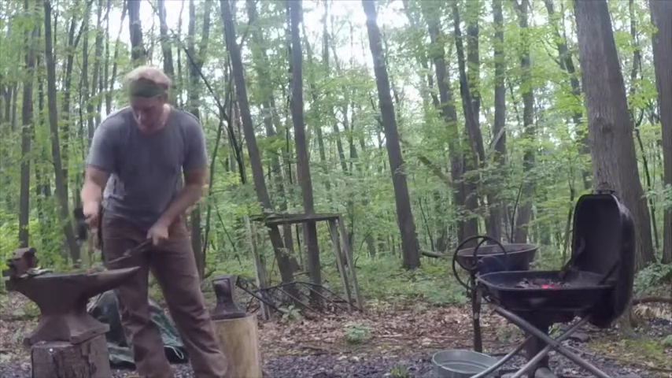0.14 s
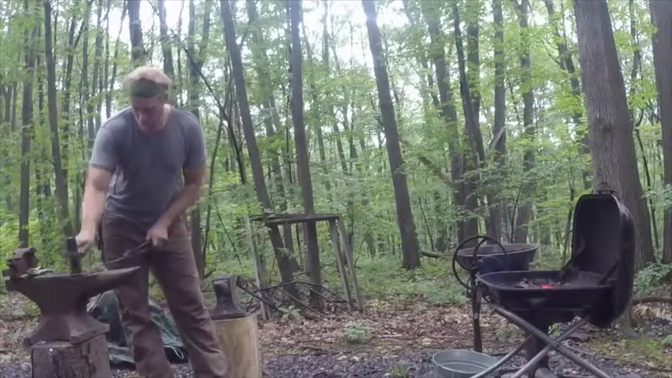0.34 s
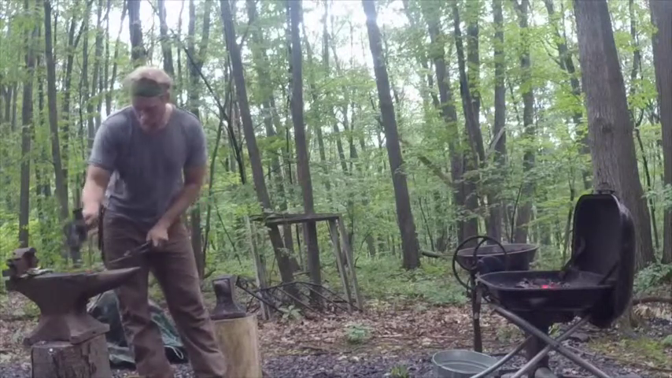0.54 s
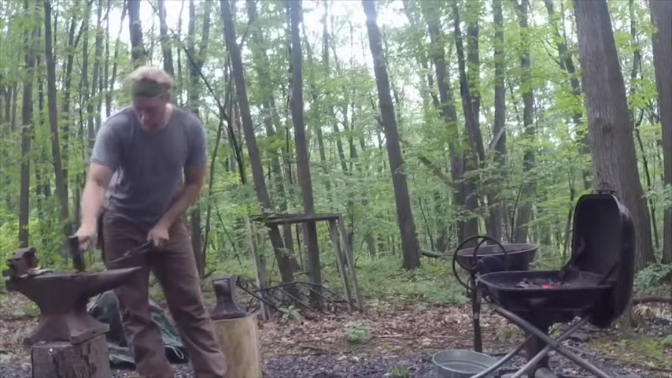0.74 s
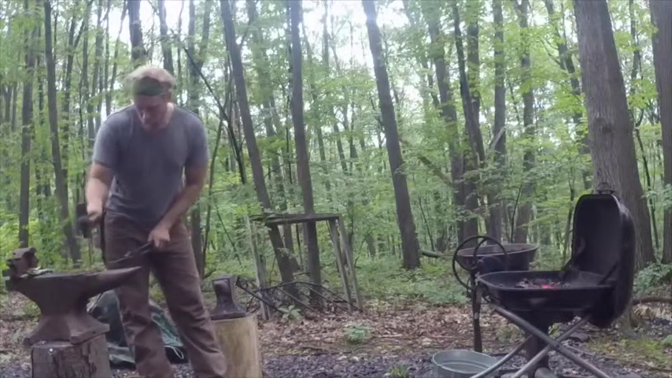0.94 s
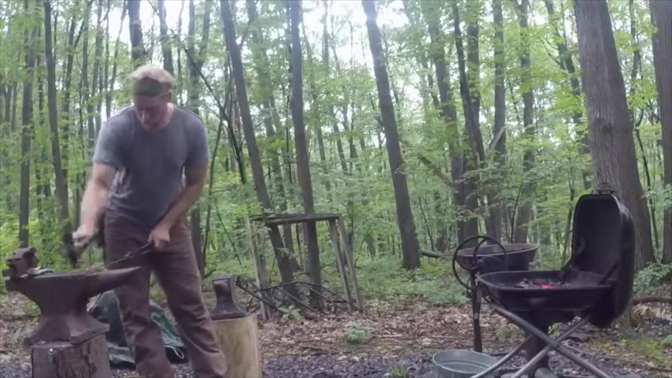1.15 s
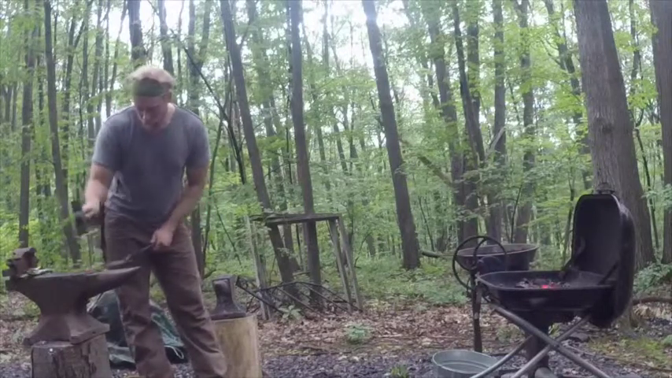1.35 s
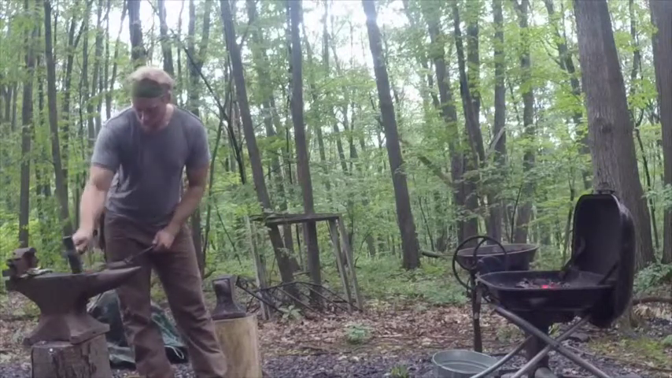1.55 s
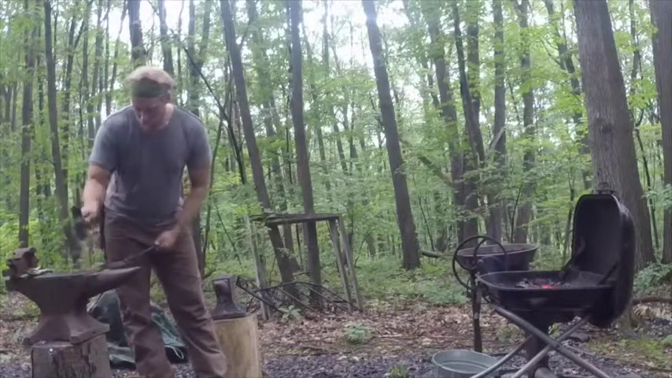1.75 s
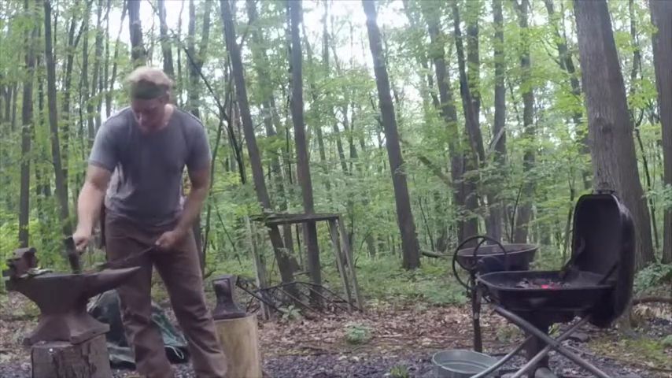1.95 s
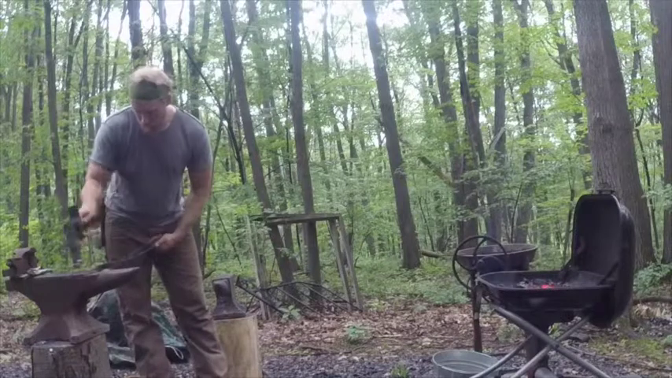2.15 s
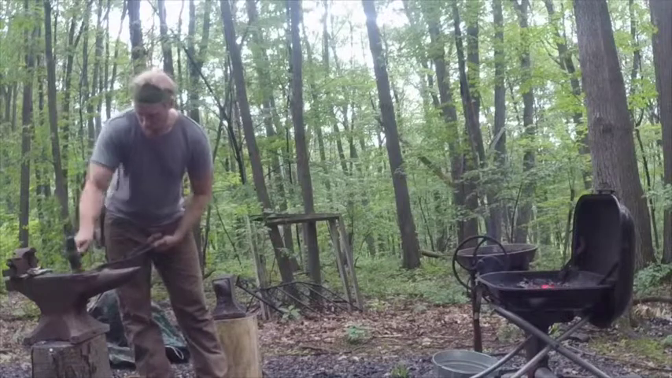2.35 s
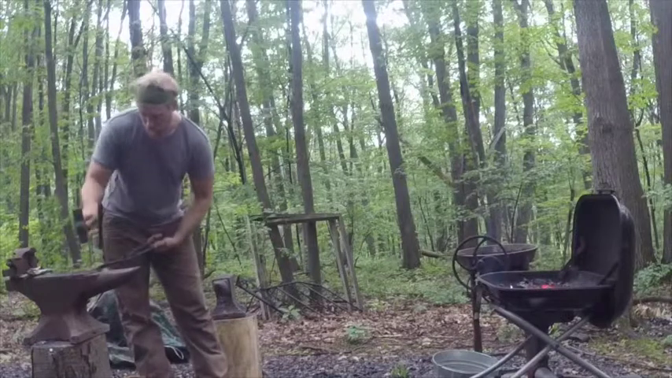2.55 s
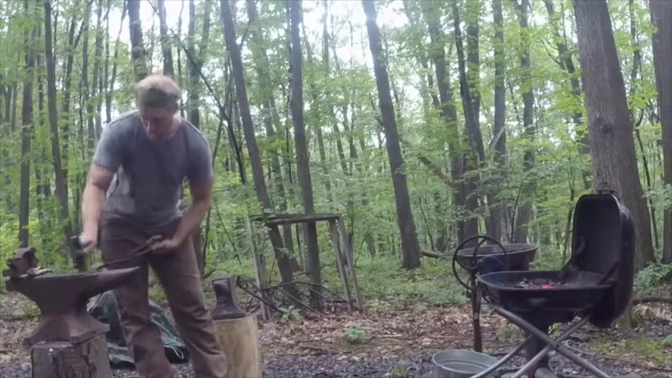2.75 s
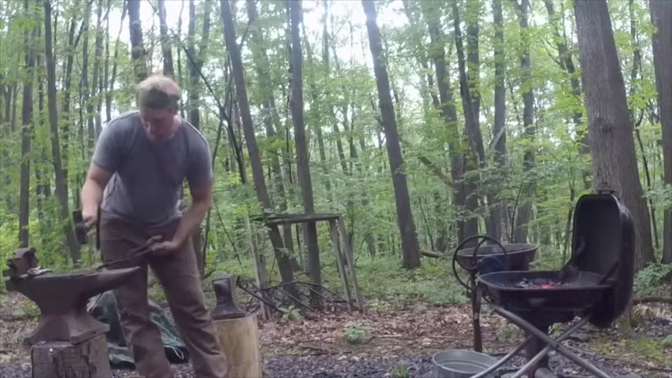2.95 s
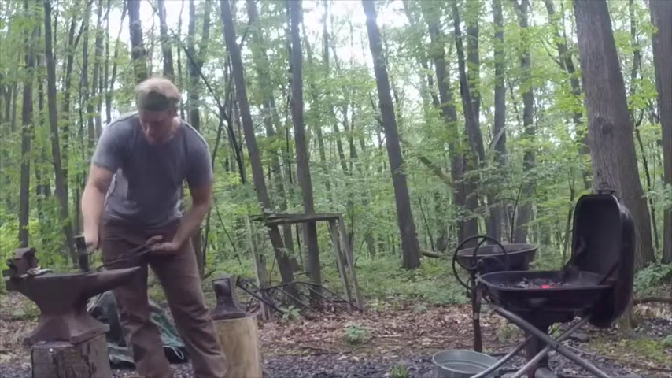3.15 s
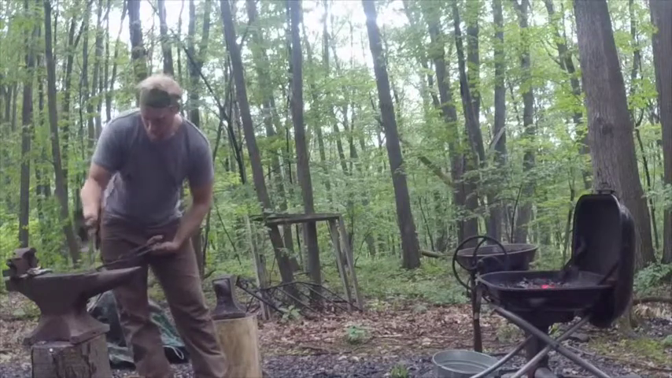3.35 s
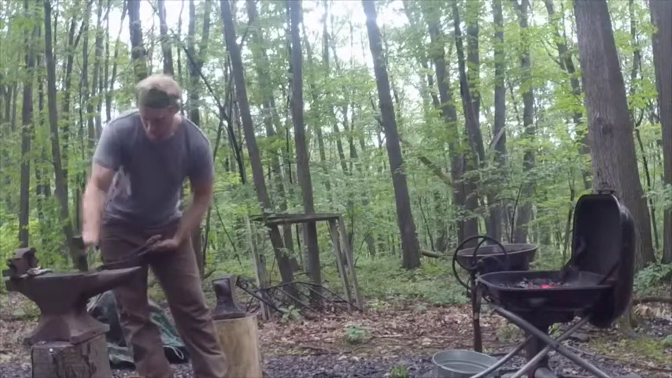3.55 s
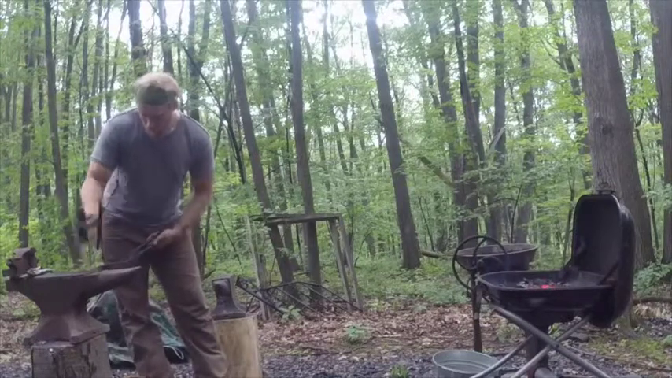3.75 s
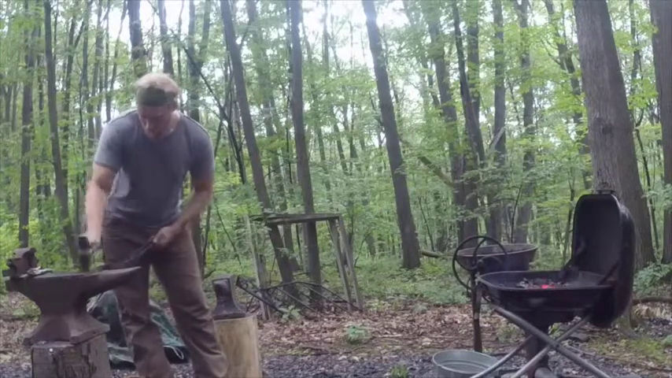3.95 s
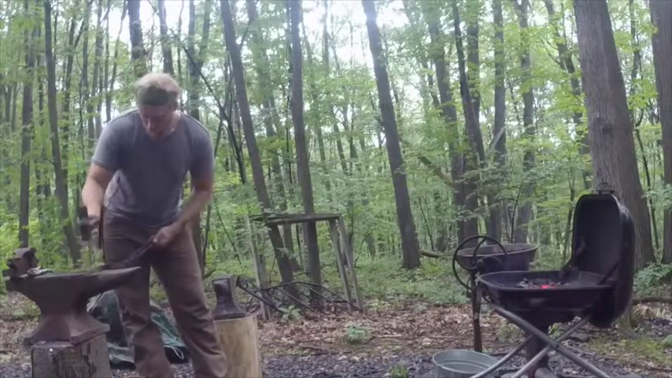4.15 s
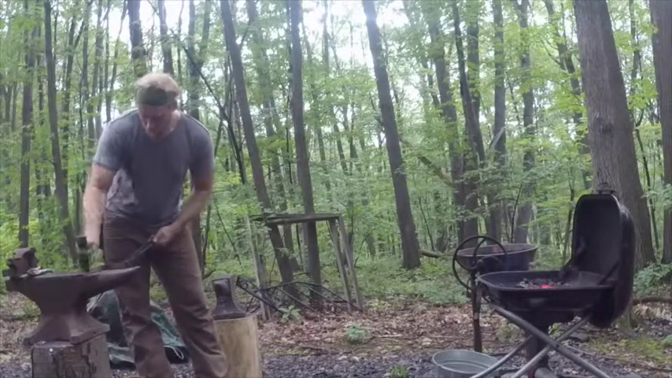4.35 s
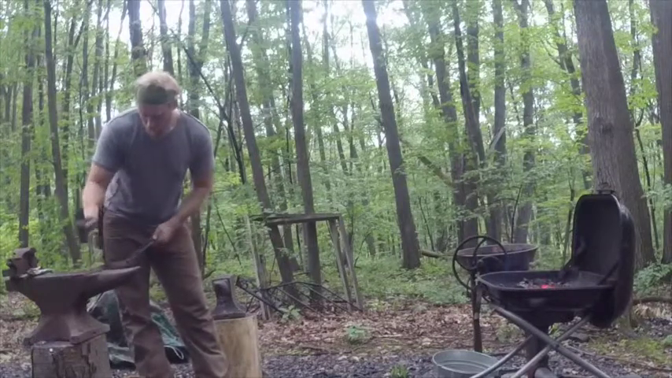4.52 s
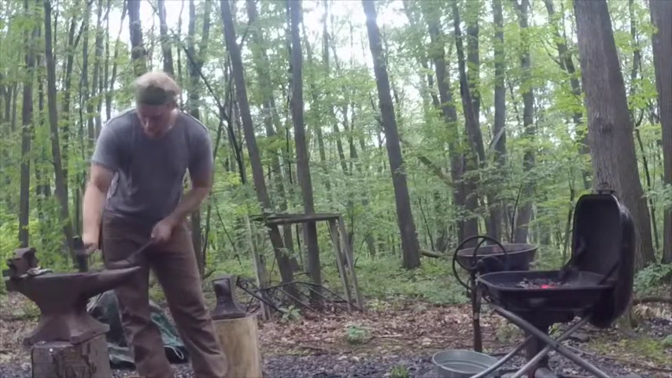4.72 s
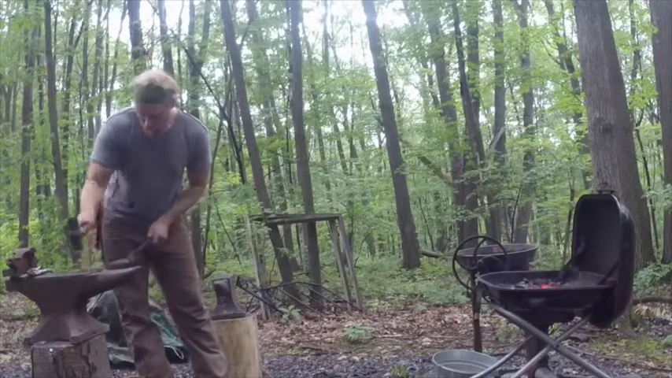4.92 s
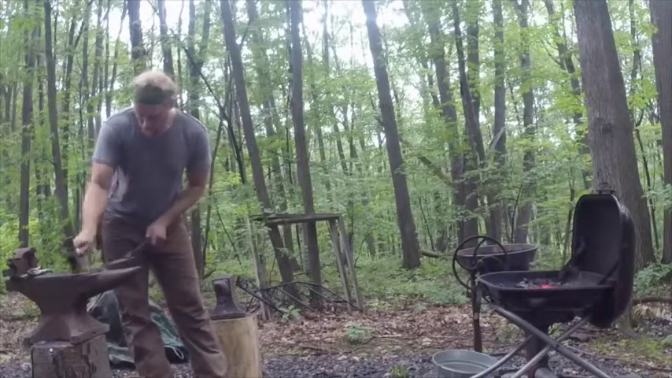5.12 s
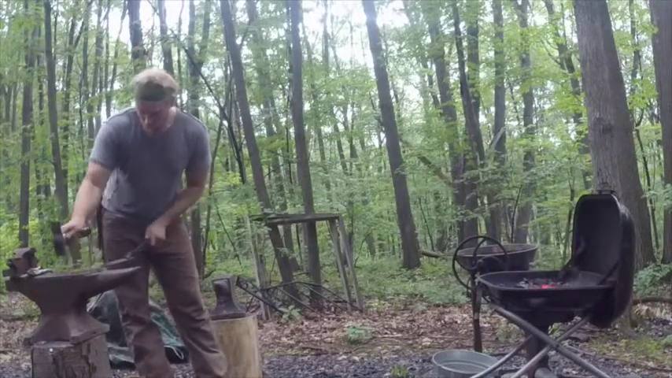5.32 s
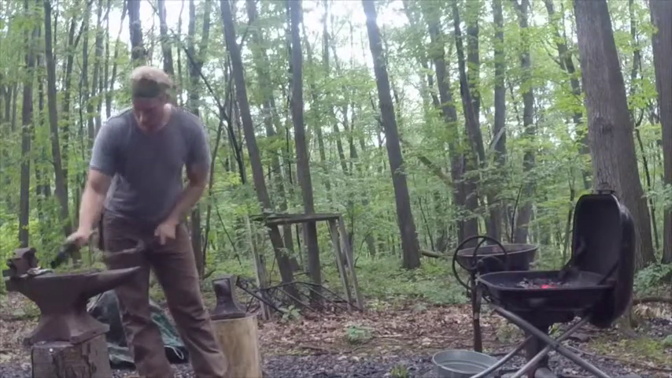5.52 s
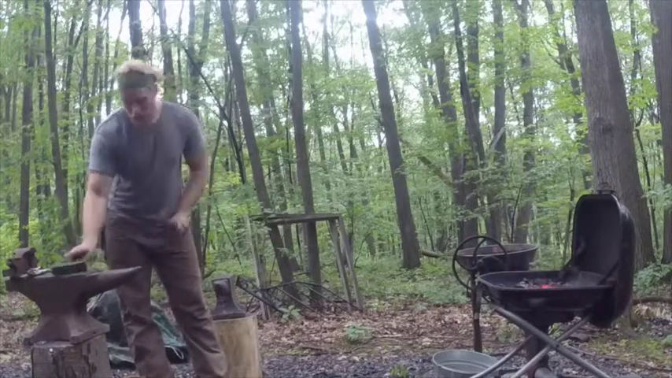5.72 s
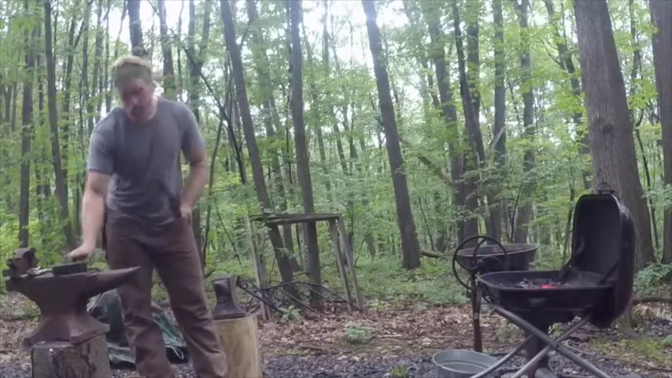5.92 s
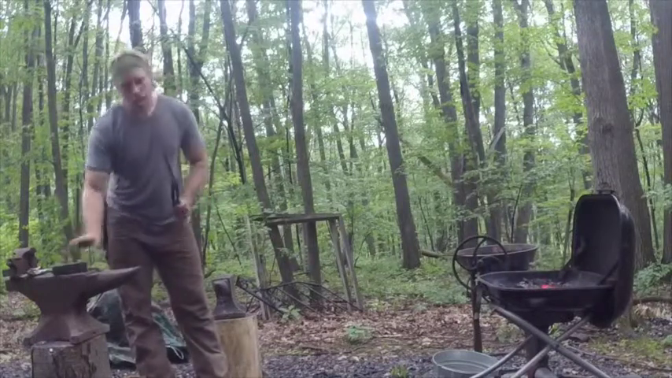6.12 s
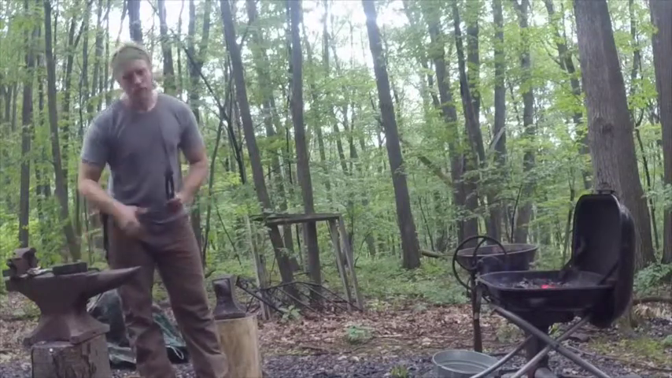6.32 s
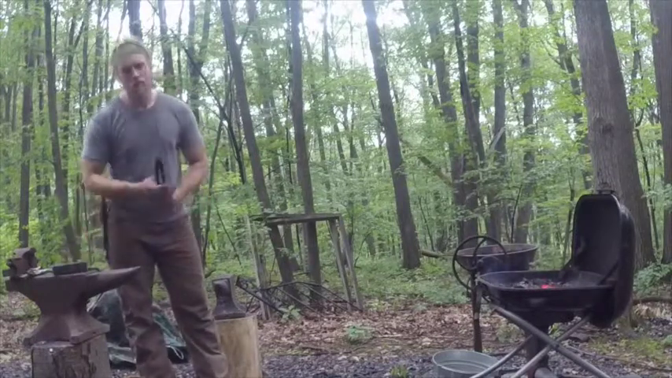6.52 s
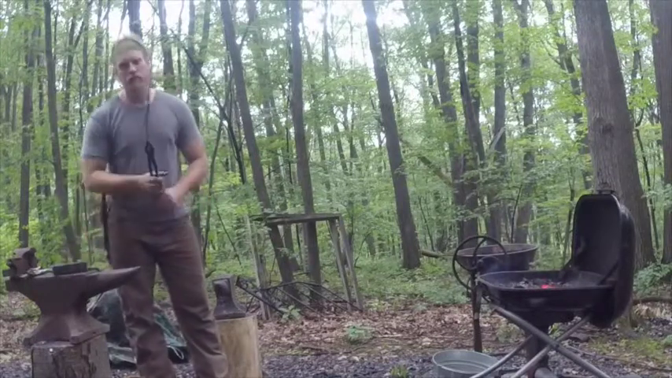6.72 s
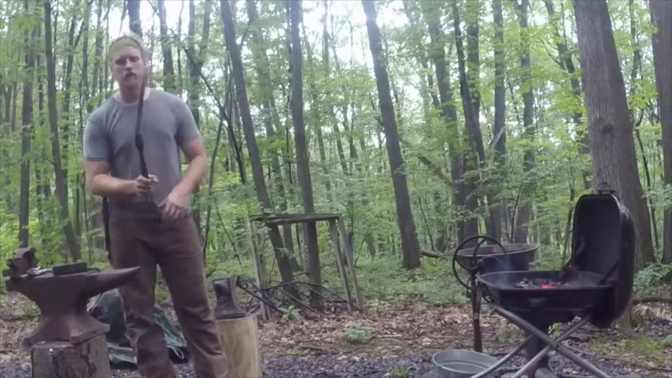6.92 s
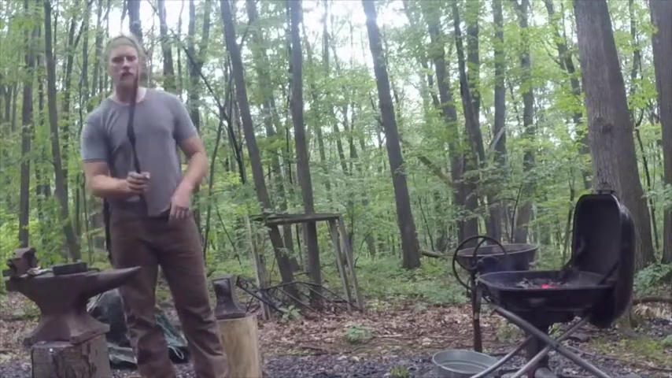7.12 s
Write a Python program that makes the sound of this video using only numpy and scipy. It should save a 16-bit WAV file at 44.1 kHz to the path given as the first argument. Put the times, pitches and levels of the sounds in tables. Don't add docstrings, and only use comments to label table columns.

```python
import sys
import numpy as np
from scipy import signal
from scipy.fft import rfft, irfft
from scipy.io import wavfile
from scipy.ndimage import uniform_filter1d

SR = 44100
rng = np.random.default_rng(int(sys.argv[2]) if len(sys.argv) > 2 else 0)


def undo_db(level):
    steps = np.asarray(level, float) / 20
    return 10 ** steps


def unload_wav(signal):
    wavfile.write(
        sys.argv[1],
        SR,
        np.round(np.clip(np.atleast_2d(signal).T, -1, 1) * 32767).astype(np.int16),
    )


N = 316197
LEAD = 2048

# (level [dB], t60 [s], change along [dB/step], across [dB/step], tilt [dB/step])
ANVIL = [(-38.5, 0.35, -10.5, -5, 2.3), (-38.5, .49, -6.5, -1.5, -1.5), (-30.5, 0.27, 3.5, -6, 8.5),
         (-47, 0.6, 2, -1.5, 6), (-35.5, 0.43, -2.5, 7.5, -1.5), (-37.5, 0.54, -1.2, 4, 1.8),
         (-32, 0.31, -3, -.3, -3), (-44, 0.51, -3.5, -5.5, -1), (-28, .272, -1.5, -4.5, 1.5),
         (-48.5, 0.87, 3.5, 1.5, 2), (-49, 0.63, -1.5, 5, -1), (-50.5, 0.36, 5, -5, -4),
         (-60, 0.29, -1, -1, -1.2), (-70, 0.39, -8, 2.9, 1)]
# (level [dB], t60 [s], change along [dB/step], across [dB/step], tilt [dB/step])
HORN = [(-54, 0.5, -8.9, 6.5, 3.4), (-51.5, 0.3, 1, -7, -3), (-46, 0.41, 1, 4.5, 6),
        (-62, 0.24, 2, -2, 1.7), (-56, 0.33, 4, -1.4, 6), (-53, 0.45, 4, -1.8, 10),
        (-60, 0.88, -3, 4.9, -3), (-51, 0.47, -7, -4.7, -13), (-62, 0.48, 2.7, 2, -6),
        (-56, 0.49, 2, 1.9, -6), (-72.8, 0.69, 2.1, 1.8, 4.5), (-65, 0.5, 4, -4, 1),
        (-70.9, 0.62, -0.4, -2, -10), (-69.5, 0.57, -1.7, 0.2, 2.1)]


def evened(x):
    return x / np.sqrt(np.mean(x ** 2) + 1e-20)


def read(points, hz):
    f, value = np.transpose(points)
    return np.interp(np.log(hz + 1), np.log(f + 1), value)


def add(mix, start_s, sound):
    part = mix[round(start_s * SR) + LEAD:][:len(sound)]
    part += sound[:len(part)]


def highpassed(x, hz, order=2):
    return signal.lfilter(*signal.butter(order, hz, "high", fs=SR), x)


def ring(hz, db, t60_s, seconds):
    t = np.arange(round(seconds * SR))[:, None] / SR
    decay = undo_db(db - 60 * t / np.maximum(t60_s, .004))
    return decay * np.sin(2 * np.pi * hz * t)


def muffled(x, free_s):
    resting_s = np.maximum(np.arange(len(x)) / SR - free_s, 0)
    return x * undo_db(-900 * resting_s)


def stump():
    # (frequency [Hz], level [dB], t60 [s], direction toward the listener [-1 or 1])
    thud_modes = [(84, -19.8, 0.216, -1), (143, -41.3, 0.398, 1), (194, -13.5, 0.053, 1),
                  (266, -17.6, 0.112, -1), (322, -19.2, 0.04, 1), (450, -21.0, 0.015, -1),
                  (579, -16.2, 0.032, -1), (850, -14.1, 0.021, 1), (966, -14.0, 0.031, 1),
                  (995, -26.2, 0.079, -1), (1047, -19.4, 0.027, -1), (1320, -29, 0.024, -1)]
    hz, db, t60_s, direction = np.transpose(thud_modes)
    return ring(hz, db, t60_s, .5) @ direction


def burst(t60_s, dull, rise_s=.0006):
    # (frequency [Hz], density [dB/Hz])
    crack_colour = [(650, 18), (1100, -4.5), (1410, -15), (2110, -8), (4830, -18), (8000, -13),
                    (13000, -21), (16000, -29)]
    size = 8192
    t, hz = np.arange(size) / SR, np.fft.rfftfreq(size, 1 / SR)
    colour = undo_db(read(crack_colour, hz) - dull * 23.9 * np.log2(1 + hz / 1500))
    colour = colour / (1 + (1250 / (hz + 1)) ** 6)
    noise = evened(irfft(rfft(rng.standard_normal(size)) * colour))
    return noise * undo_db(-60 * t / t60_s) * (1 - np.exp(-t / rise_s))


def anvil():
    body_hz = [1616, 1740, 2217, 2803, 3390, 3708, 3833, 4334, 4844, 6022, 6403, 6815, 7032, 9511]
    horn_hz = [3204, 4156, 6328, 7470, 7624, 7807, 8088, 8262, 8378, 8989, 9250, 9944, 12028, 13502]
    # (offset [Hz], signed share [1], t60 [s])
    body_twins = [(-28.9, -.06, .53), (-7.0, .29, .58), (4.3, .17, .54), (0.0, 4.74, .16), (-3.0, -.15, .8),
                  (-14.8, -.04, .8), (-6.4, -.3, .39), (-4.3, .08, .59), (-.9, -.77, .36),
                  (-10.6, -.16, .47), (4.5, 5.0, .15), (4.0, .08, .8), (-6.8, -.18, .38),
                  (-11.1, 1.62, .19)]
    # (offset [Hz], share [1], t60 [s])
    horn_twin = (-5, .3, .16)
    hz = np.array(body_hz + horn_hz)
    t60_s = np.transpose(ANVIL + HORN)[1]
    offset_hz, share, twin_t60_s = np.transpose(body_twins + [horn_twin] * len(HORN))
    return ring(hz, 0, t60_s, .6) + share * ring(hz + offset_hz, 0, twin_t60_s, .6)


def either_sign():
    return rng.choice([-1., 1.], len(ANVIL + HORN))


def blows(modes, thud):
    # (time [s], contact hardness [dB], place across the face [-1..1], hammer tilt [-1..1], bar ring [dB])
    strikes = [(-0.0077, -13.5, 0.19, -0.44, -39.5), (0.374, -0.8, 0.26, -0.33, -42),
               (0.744, 1, -0.93, -0.15, -35), (1.1276, 9, -0.2, -0.42, -32), (1.5541, -7, 0.002, 0.17, -29),
               (1.954, -1.8, -0.11, -0.24, -29.5), (2.3633, -12, -0.2, 1, -28),
               (2.8013, -6, -0.047, -0.73, -32), (3.1957, 0, 0.23, 0.15, -33.5),
               (3.5925, -1.5, -0.78, -0.16, -31), (4.006, 6.5, 0.064, 0.13, -35),
               (4.3875, 6, -0.48, .05, -31), (4.7803, 8, 0.64, 0.78, -51), (5.1616, 3, -.13, -0.24, -26)]
    # (multiple of the bar's pitch [1], level [dB], t60 [s])
    bar_modes = [(.9, -29, 0.15), (0.998, 3, 0.06), (1.07, -2.5, 0.077), (1.9, 8, 0.01), (2.5, -43, .03)]
    dull = .3
    knock, clang = np.zeros(N + LEAD), np.zeros(N + LEAD)
    mode_db, _, *shape = np.transpose(ANVIL + HORN)
    multiple, part_db, bar_t60_s = np.transpose(bar_modes)
    for s, hard_db, across, tilt, bar_db in strikes:
        bar_hz = 983 - 1.8 * hard_db
        bar = muffled(ring(bar_hz * multiple, part_db, bar_t60_s, .2).sum(1), free_s=.034)
        struck_s = s + .00228
        hop_s = struck_s + 14 / bar_hz
        crack = burst(0.053, dull) + undo_db(-13.0) * burst(0.14, dull)
        add(knock, s, undo_db(0.34) * thud)
        add(knock, s + 0.000999, undo_db(-16 + 0.47 * hard_db) * crack)
        add(knock, struck_s, undo_db(bar_db) * bar)
        add(knock, hop_s, undo_db(bar_db + 3.5) * bar)
        add(knock, hop_s, undo_db(-32) * burst(0.066, dull, rise_s=0.0026))
        along = .09 * hard_db
        drive = undo_db(mode_db + hard_db + np.array([along, across, tilt]) @ shape)
        add(clang, s + 0.000998, modes @ (drive * either_sign()))
        add(clang, hop_s, undo_db(-15) * modes @ (drive * either_sign()))
    return knock, clang


def air():
    # (frequency [Hz], density [dB/Hz])
    wash_colour = [(12, -12), (20, 8), (87, -5.5), (284, -9.5), (812, -15.5), (2200, -22), (3820, -26),
                   (14800, -45.5)]
    frames, hz = N // 256 + 5, np.fft.rfftfreq(1024, 1 / SR)
    a, b, patches = rng.standard_normal((frames, 513, 3)).T
    patches = uniform_filter1d(patches, size=12, axis=0)
    patches = evened(uniform_filter1d(patches, size=14, axis=1))
    gusts = evened(uniform_filter1d(rng.standard_normal(frames), size=20))
    lumpy_db = .6 * gusts / (1 + hz[:, None] / 150)
    z = (a + 1j * b) * undo_db(read(wash_colour, hz)[:, None] + 0.98 * patches + lumpy_db)
    return undo_db(-47) * evened(signal.istft(z, nperseg=1024, noverlap=768)[1][:N])


def trees():
    # (frequency [Hz], t60 [s], level [dB])
    trunk_bands = [(150, 0.13, -1), (298, 0.31, -19.5), (935, 0.6, -15.5), (2000, 0.72, -13.5),
                   (3670, 0.95, -10), (8050, 0.48, -8.5), (14100, 0.52, -14.5)]
    echoes = np.zeros(SR)
    at = np.arange(500, SR - 20, 20)
    echoes[at + rng.integers(0, 20, len(at))] = rng.choice([-1., 1.], len(at))
    hz, t, z = signal.stft(echoes, SR, nperseg=256)
    band_hz, band_t60_s, band_db = np.transpose(trunk_bands)
    t60_s = read([*zip(band_hz, band_t60_s)], hz)[:, None]
    db = read([*zip(band_hz, band_db)], hz)[:, None]
    even = 1 / np.sqrt(SR / 20 * t60_s / np.log(1e6))
    return signal.istft(z * even * undo_db(db - 60 * t / t60_s), SR, nperseg=256)[1]


def clicks():
    # (time [s], level [dB], frequency [Hz], width [Hz], t60 [s])
    ticks = [(1.456, -30, 830, 250, 0.025), (1.455, -36, 3000, 2500, 0.015),
             (1.4565, -47, 8340, 1200, 0.027), (2.576, -36, 2500, 1500, 0.018),
             (3.121, -47, 5000, 3000, .02), (5.988, -35.5, 716, 150, 0.041),
             (6.476, -49, 6840, 2000, 0.037), (6.487, -42.5, 3000, 700, .015),
             (6.614, -43.5, 7900, 900, .015), (6.6213, -32.5, 2600, 900, 0.013),
             (6.627, -52, 2940, 900, .08), (6.957, -48, 2800, 800, .03)]
    size = 2048
    out, t = np.zeros(N + LEAD), np.arange(size) / SR
    for s, db, hz, width_hz, t60_s in ticks:
        shape = 1 / (1 + ((np.fft.rfftfreq(size, 1 / SR) - hz) / width_hz) ** 4)
        puff = evened(irfft(rfft(rng.standard_normal(size)) * shape))
        add(out, s, undo_db(db - 60 * t / t60_s) * (1 - np.exp(-t / 0.0012)) * puff)
    return out


def laid_down(modes, thud):
    # (time [s], head ring [dB], tick [dB], thud [dB])
    touches = [
        (5.6901, -35, -23, -19),
        (5.7069, -17.5, -15, -13.5),
        (5.782, -34, -36, -25),
        (5.7897, -21.5, -21, -32),
        (5.8243, -26, -33, -43),
        (6.0002, -50, -60, -32),
        (6.0237, -27, -42, -26),
        (6.0758, -44, -60, -38),
        (6.1, -44, -58, -44),
    ]
    # (frequency [Hz], level [dB], t60 [s])
    head_modes = [(213, -7, 0.043), (431, -12.5, 0.26), (1062, -5, 0.04), (2005, 5.5, 0.061),
                  (1990, -24, 0.07), (2340, -44, 0.018), (3410, -10, 0.09), (3560, -10, 0.085),
                  (4100, -24, 0.11), (9200, -27, .05), (13600, -16, .05)]
    # (first [dB], second [dB])
    face_db = [(-52, -58), (-51, -60), (-45, -49), (-46.5, -56), (-39, -40), (-34, -28.5), (-26.5, -35),
               (-52, -52), (-31, -33), (-60, -51), (-39.5, -52), (-57, -62), (-53, -60), (-34.5, -53)]
    # (first [dB], second [dB])
    horn_touch_db = (5, -6)
    dull = 0.45
    knock, clang = np.zeros(N + LEAD), np.zeros(N + LEAD)
    soft = signal.windows.hann(9) / 4
    head = np.convolve(ring(*np.transpose(head_modes), .2).sum(1), soft)
    head = muffled(head, free_s=.02)
    for s, head_db, tick_db, thud_db in touches:
        tick = burst(0.068, dull, rise_s=0.00026) + undo_db(-20) * burst(0.93, dull)
        tick = highpassed(tick, 2200)
        add(knock, s, undo_db(head_db - 5) * head)
        add(knock, s + 0.00354, undo_db(head_db) * head)
        add(knock, s, undo_db(tick_db) * tick + undo_db(thud_db) * thud[:len(tick)])
    horn_db = [np.add(row[0], horn_touch_db) for row in HORN]
    first_db, second_db = np.transpose(face_db + horn_db)
    first_s, second_s = touches[1][0], touches[3][0]
    stilled = np.clip((second_s - first_s - np.arange(len(modes)) / SR) / .004 + 1, 0, 1)
    add(clang, first_s, stilled * (modes @ (undo_db(first_db) * either_sign())))
    add(clang, second_s, modes @ (undo_db(second_db) * either_sign()))
    return knock, clang


def scene():
    modes, thud = anvil(), stump()
    knock, clang = blows(modes, thud)
    rattle, chime = laid_down(modes, thud)
    small = rattle + clicks()
    ground = np.roll(knock + small, round(.00575 * SR))
    echoes = highpassed(trees(), 200)
    sent = knock + undo_db(-10) * small + undo_db(-8) * (clang + chime)
    wet = signal.fftconvolve(sent, echoes)[:N + LEAD]
    contacts = knock + small + clang + chime + .27 * ground + wet
    return (contacts[LEAD:] + air())[None]


def starved(x):
    hz, _, z = signal.stft(x, SR, nperseg=1024)
    band_power = (abs(z[:512]) ** 2).reshape(64, 8, -1).mean(1)
    band_db = 10 * np.log10(np.repeat(band_power, 8, 0) + 1e-20)
    over_db = band_db - np.median(band_db, 1, keepdims=True)
    need_db = np.select([hz[:512] > 15100, hz[:512] > 12800], [16, -1.3], -99)[:, None]
    z[:512] *= over_db > need_db
    return signal.istft(z, SR, nperseg=1024)[1][:N]


def band_limit(x):
    return signal.sosfilt(signal.butter(12, 16490, fs=SR, output="sos"), x)


def record(dry):
    cut = highpassed(dry[0], 22, order=1)
    cut = signal.oaconvolve(cut, signal.firwin(127, 15600, fs=SR), "same")
    return band_limit(starved(cut)[None])


dry = scene()
out = record(dry)
unload_wav(out)
```